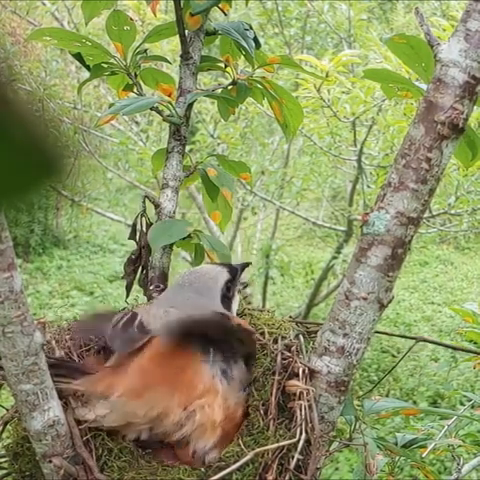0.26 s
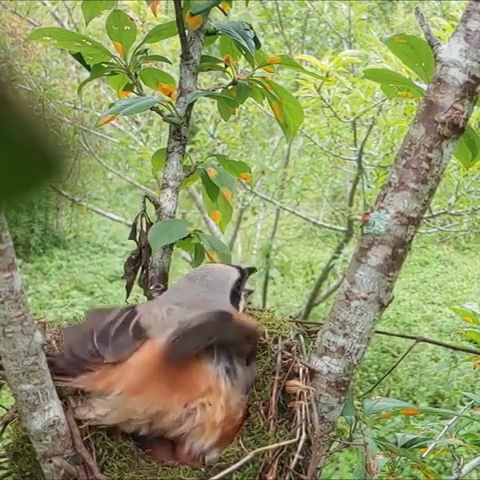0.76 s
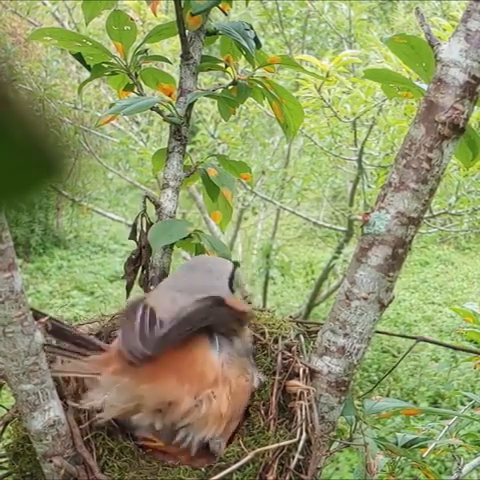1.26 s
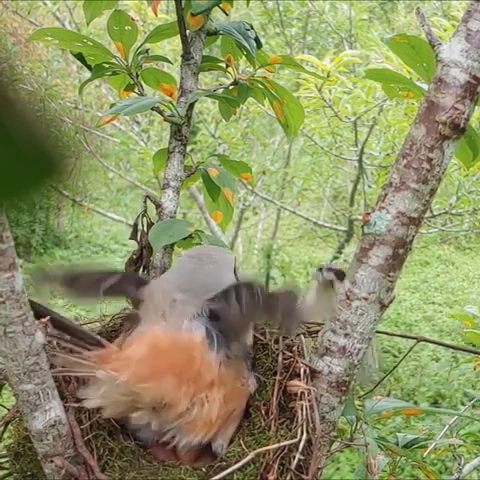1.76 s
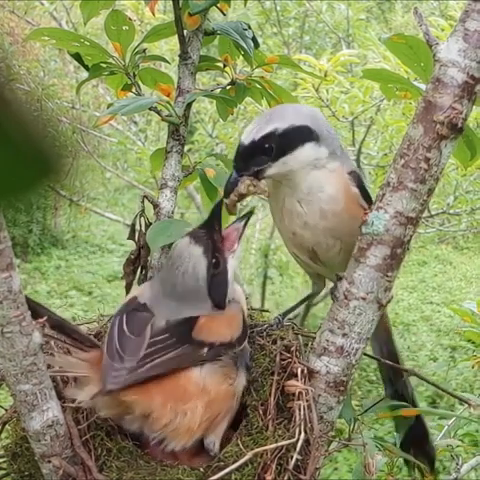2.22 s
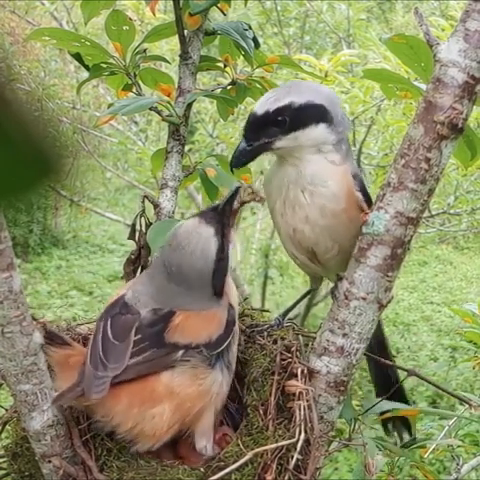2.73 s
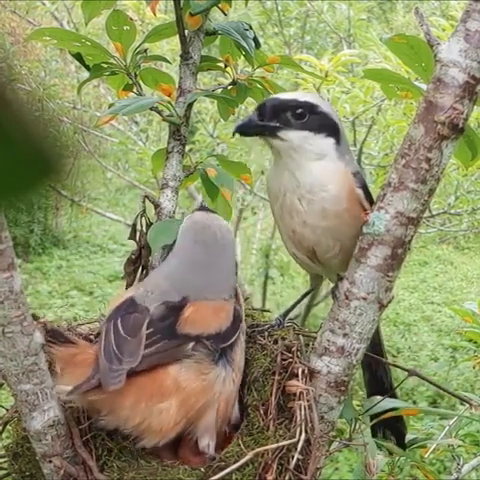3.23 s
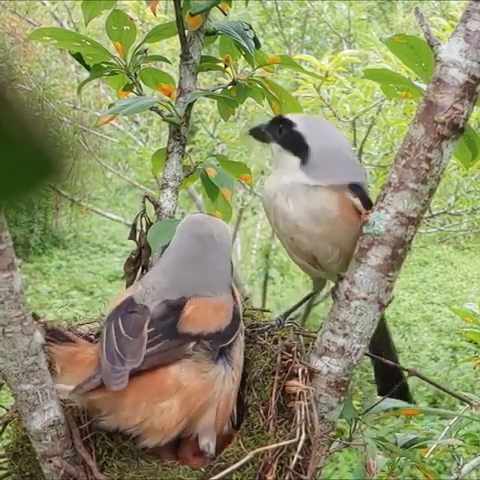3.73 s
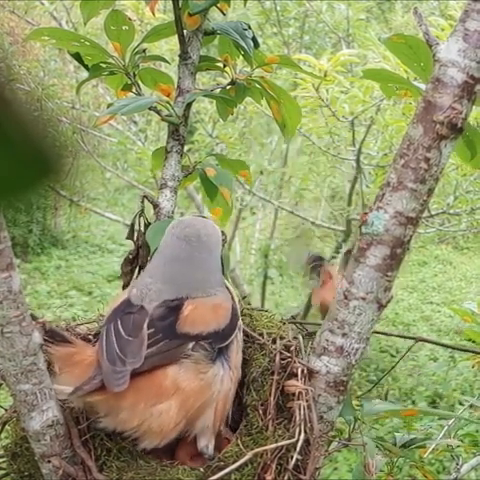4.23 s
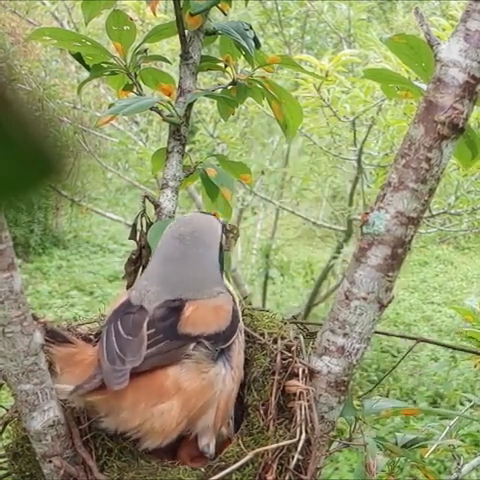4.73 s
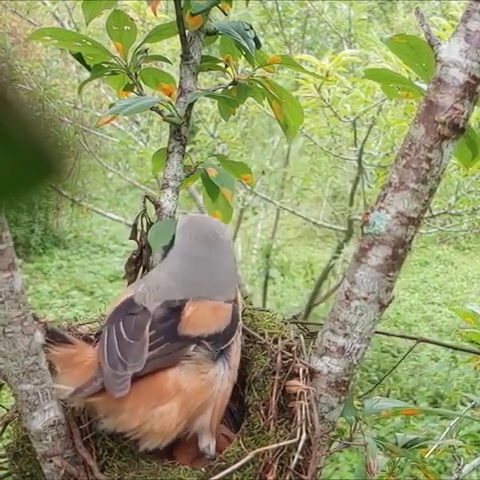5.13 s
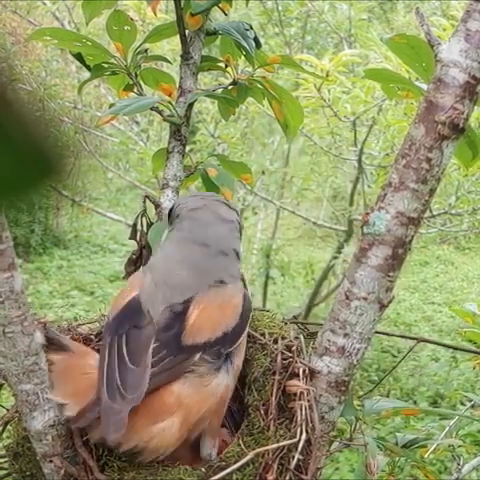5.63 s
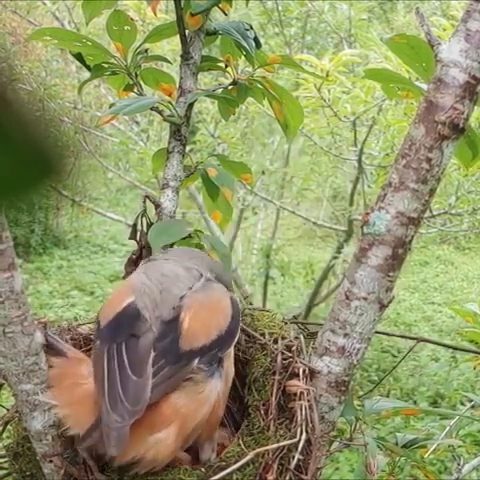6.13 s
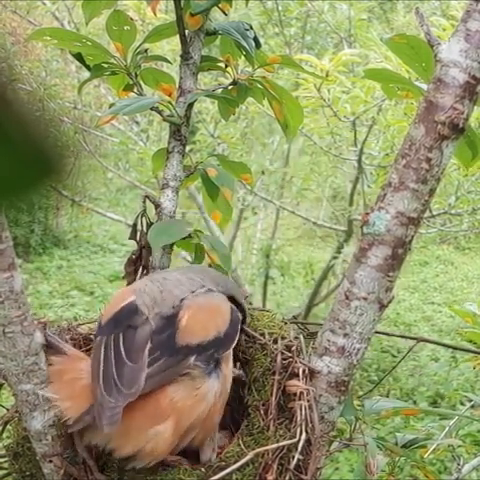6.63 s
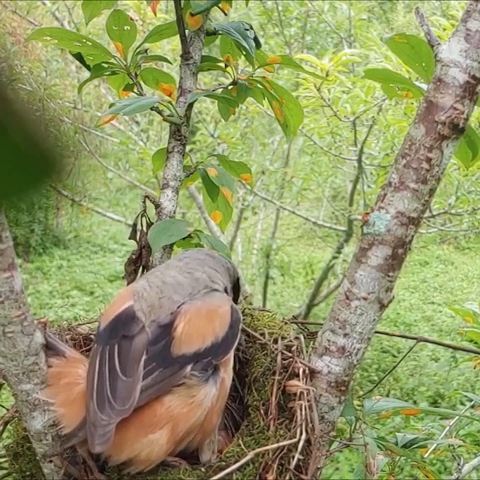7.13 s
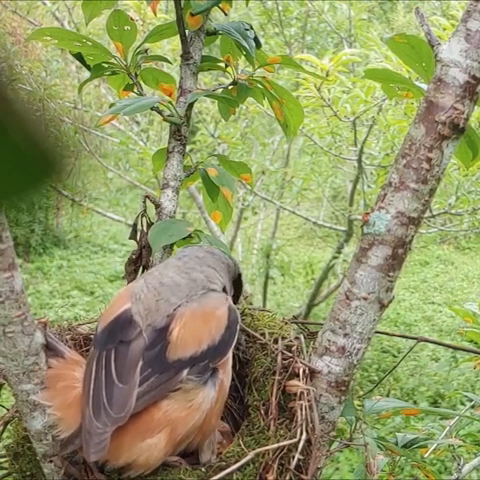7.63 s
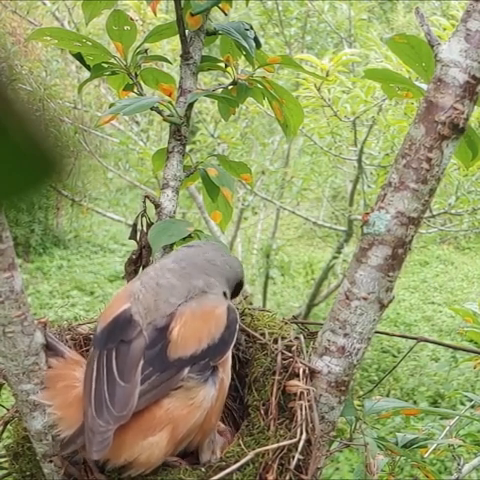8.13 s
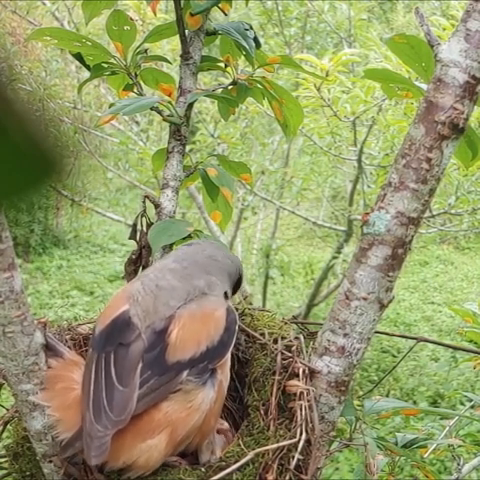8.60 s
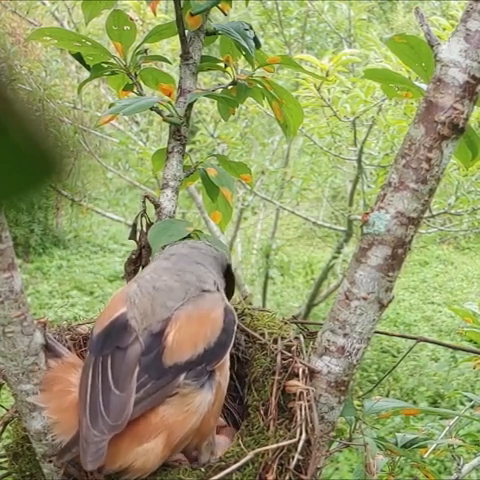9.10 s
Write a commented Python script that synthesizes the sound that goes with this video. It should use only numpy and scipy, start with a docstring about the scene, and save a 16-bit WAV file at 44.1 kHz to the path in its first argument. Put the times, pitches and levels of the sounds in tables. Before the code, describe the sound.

A high, steady insect drone with fine sizzle, wavering tones and quick trills surrounds a close nest in a quiet wood. From 0 s a begging nestling is already calling: a short rasp, then a long, rough, nasal cry from about 0.35 to 1.6 s. At 1.5-2.1 s the parent flutters in with soft, low puffs of air and a light landing knock. The third cry climbs, becoming very loud, clearer and squealing around 2.2-2.8 s as food is passed. Shorter, strained, quavering cries follow, each weaker, ending near 4.2 s. Irregular take-off flaps at 4.2-4.5 s become an even whirr, fading by about 5.7 s. A faint twig tap comes near 5.1 s and one soft low peep at 6.4 s. Distant chips follow until 7.7 s, then falling whistles near 7.6, 8.0 and 9.1 s, with thin notes around 8-8.7 s.

```python
"""Insects drone in the wood throughout: noise bands, wavering tones and trills of short falling notes.
From the start a shrike nestling begs in six rasping calls: rough harmonics pass through throat resonances.
The parent flutters in on pulses of pushed air; the calls clear to a shrill squeal as it is fed, then sink.
Small birds call far off in gliding tones, their echo scattered by the trees. The parent whirrs away,
its even wing beats fading with distance, and later the nestling gives one soft peep."""
import sys
import numpy as np
from scipy import signal
from scipy.fft import rfft, irfft, next_fast_len
from scipy.io import wavfile
from scipy.ndimage import uniform_filter1d, map_coordinates

SR = 44100
rng = np.random.default_rng(int(sys.argv[2]) if len(sys.argv) > 2 else 0)


def store_wav(level_fs):
    """Save 16-bit WAV to argv[1]."""
    pcm = np.round(np.clip(np.atleast_2d(level_fs), -1, 1) * 32767)
    wavfile.write(sys.argv[1], SR, pcm.T.astype(np.int16))


N = 412776

# Lower band of the insect chorus. Each row: frequency in Hz, relative density in dB per Hz.
BUZZ_SPECTRUM = [(1290, -49), (2200, -52), (2380, -41), (2500, 23), (2550, -58), (2720, 10.5), (3070, 18),
                 (3300, 20.5), (4290, -23), (7260, -120)]
# Slow swell of that band. Each row: time in seconds, level in dB.
BUZZ_SWELL = [(4.25, -66), (5.32, -90), (5.56, -52.5), (5.96, -72), (6.36, -66), (7.12, -62), (8.75, -52.5),
              (9.13, -53), (9.36, -51.5)]
# Middle band of the chorus. Each row: frequency in Hz, relative density in dB per Hz.
DRONE_SPECTRUM = [(1940, -52), (3300, -0.5), (4010, 6.5), (4370, 4), (4760, -17), (5000, -57), (6500, -48),
                  (11000, -120)]
# Upper band of the chorus. Each row: frequency in Hz, relative density in dB per Hz.
SIZZLE_SPECTRUM = [(2820, -43), (4800, -54), (4950, -0.5), (5490, -0.5), (6480, 12.5), (7350, -0.5),
                   (8630, -5.5), (10300, -13), (10800, -20.5), (11600, -20), (12200, -27), (12600, -52),
                   (14000, -63)]
# Insect tones. Each row: mean frequency in Hz, relative steady level in dB,
# level in dB relative to the buzz of the part that swells with it.
WHINE_TONES = [(2395, -66, -31), (2550, -80, -21.5), (2640, -57, -20), (2750, -67, -2.5),
               (2837, -57.5, -13), (2910, -76, 2.5), (2995, -59, -18), (3130, -77, -7), (3166, -55, 1),
               (3436, -54, 1), (3747, -59, -5)]
WHINE_DRIFT_DB = 2
# Hush of the wood. Each row: frequency in Hz, relative density in dB per Hz.
AIR_SPECTRUM = [(12, -40), (20, -6), (54, -0.5), (200, -3.5), (244, -6), (280, -1.5), (409, -8.5),
                (551, -7.5), (1370, -16.5), (2000, -19), (2300, -15.5), (2990, -10), (5060, -120)]
AIR_DB = -57
# Likeness of left and right in diffuse sound. Each row: frequency in Hz, correlation from -1 to 1.
EAR_LIKENESS = [(60, 0.049), (130, 0.12), (290, 0.29), (630, 0.24), (1380, 0.15), (3010, 0.22),
                (6600, -0.29), (14400, 0.98)]

# Begging calls, one list of rows each. Each row: time in seconds, pitch in Hz before the bends at the ends,
# roughness (limited to 0-1), effort in dB, closing of the bill from 0 to 1,
# main throat resonance in Hz, upper throat resonance in Hz.
BEG_CALLS = [
    [(-.1, 855, 0.73, 3, 0.23, 3140, 5360), (.18, 866, 0.75, 1.5, 0.17, 2980, 5400),
     (.262, 876, 1, 6, 0.2, 3220, 5370), (.296, 845, 1.23, 1, 0.2, 3450, 5600)],
    [(.35, 720, 0.85, -7.5, 0.23, 3300, 5500), (.46, 762, 0.73, -2.5, 0, 3020, 5900),
     (.55, 751.6, 0.77, -0.5, 0.03, 3180, 6100), (1.1, 747, .87, 1.5, 0.07, 3180, 5880),
     (1.34, 797, 0.84, 4, 0.02, 3230, 5850), (1.43, 739, 0.82, 1.5, .02, 3050, 6060),
     (1.468, 825, 0.62, 6, 0.28, 3274, 6350), (1.49, 814, 0.64, 4.5, 0.13, 3300, 6360),
     (1.545, 852, 0.47, 8, 0.29, 3350, 6460), (1.568, 863, 0.35, 9, 0.07, 3700, 6100),
     (1.59, 793, 1, 1, 0, 3900, 5800)],
    [(1.641, 690, 0.9, -6.5, 0.02, 3350, 6100), (1.74, 682, 0.69, -1.5, 0, 2860, 6160),
     (1.87, 770.4, 0.83, 4.5, 0.07, 3470, 5800), (2.06, 781, 0.76, 5.5, 0.02, 3220, 5340),
     (2.14, 811, 0.82, 9, 0.18, 3250, 5500), (2.163, 814, 0.94, 9, .3, 3267, 5600),
     (2.185, 828, 0.74, 11, 0.21, 3000, 5430), (2.33, 839, 0.73, 13, .27, 3010, 5940),
     (2.342, 868, 0.37, 11.5, 0.11, 3100, 5600), (2.36, 858, 0.3, 12.5, 0.28, 3195, 5200),
     (2.4, 850, 0.03, 12.5, 0.2, 2975, 5280), (2.424, 843, 0.18, 14, 0.2, 2760, 5100),
     (2.432, 843, 0.65, 9.5, .21, 2600, 5800), (2.455, 871, 0.48, 11.5, 0.34, 2750, 6000),
     (2.52, 848, 0.2, 9.5, 0.32, 2900, 5900), (2.615, 821, 0.28, 6.5, 0.35, 2860, 5750),
     (2.655, 855, 0.25, 6.5, 0.35, 3016, 6000), (2.672, 876, 0.04, 11.5, 1, 2800, 5300),
     (2.692, 860, 0.54, 7, 0.48, 2700, 5600), (2.725, 900, 0.34, 10.5, .55, 2680, 6000),
     (2.757, 939, 0.56, 11.5, 0.73, 2674, 6150), (2.778, 843, 1.1, 7, 1, 2820, 5600)],
    [(2.834, 722, 1.08, 1.5, 0.67, 2810, 5190), (2.88, 631, 0.91, -7.5, 0.49, 4070, 4900),
     (2.975, 676, 0.9, -1, 0.6, 4600, 4790), (2.995, 713, 0.89, -1, 0.6, 4260, 4950),
     (3.1, 767, 0.81, 2, 0.73, 4230, 4700), (3.15, 757, 0.55, -1.5, 0.68, 4300, 4400),
     (3.19, 830, 0.72, 4, 0.7, 3800, 5000), (3.222, 890, 0.68, 5, 0.94, 3100, 4600),
     (3.25, 739, 1, -5, 0.55, 3100, 4500)],
    [(3.303, 652, 1.17, -9.5, 0.44, 3700, 5000), (3.36, 622.6, 1, -10.5, 0.43, 3950, 4960),
     (3.42, 710, 0.81, -2.5, 0.45, 4250, 4900), (3.52, 784, 0.7, -2, 0.59, 4130, 4860),
     (3.575, 820, 0.6, -1.5, 0.58, 3900, 4600), (3.622, 830, 0.4, 2, 0.58, 3400, 4140),
     (3.658, 620, 0.94, -11, 0.4, 3330, 4280)],
    [(3.81, 597, 0.83, -48, 0.3, 3600, 5200), (3.86, 588.5, 0.9, -21, 0.3, 3700, 5200),
     (3.89, 673, 0.92, -12, 0.42, 3500, 5000), (3.94, 702, 0.77, -10, 0.54, 3730, 4900),
     (4.005, 705, 0.71, -12, 0.47, 3750, 4800), (4.038, 641, 0.52, -12.5, 0.7, 3650, 4600),
     (4.053, 618, 1.06, -11, 0.5, 3540, 4800), (4.062, 634, .95, -9, 1, 3500, 4800),
     (4.076, 635, 0.97, -9, 0.7, 3550, 4900), (4.086, 704, .92, -5.5, .56, 3700, 5200),
     (4.132, 725.6, 0.85, -6, .66, 3650, 5100), (4.152, 660, 0.8, -7, 0.6, 3750, 4600),
     (4.182, 560, .75, -13, 0.6, 3700, 4500)],
]
ATTACK_S, RELEASE_S = 0.01, 0.014
ONSET_LEAP, SETTLE_S = 0.36, 0.016  # share by which the pitch starts too high, time constant of settling
END_DROP, DROP_S = 0.38, 0.009  # share by which the pitch falls at the end, time constant of the fall
# The strained voice shakes: mean rate, depth as a share of the pitch, depth in level.
QUIVER_HZ, QUIVER_SHARE, QUIVER_DB = 66, 0.05, 3
# Random level curves of the voice: depth in dB, random knots per second.
BREAK_DB, BREAK_RATE = 3, 65  # harmonics, most in the upper ones
PARTIAL_DRIFT_DB, PARTIAL_DRIFT_RATE = 1.8, 14  # every harmonic alike in depth
WAVER_DB, WAVER_RATE = 1, 34  # each resonance, behind a closing bill
CREAK_DB, CREAK_RATE = -2.5, 58  # uneven pulses of a hoarse voice behind a closing bill
GRAIN_DB, OPEN_GRAIN = 3.8, 0.25  # depth factor of the hoarse grains, offset for an open bill
# Turbulence in the open bill. Each row: frequency in Hz, relative density in dB per Hz.
BREATH_SPECTRUM = [(600, -11.5), (1800, 4.5), (3000, -1), (12000, 1)]
# Radiation from the open bill. Each row: frequency in Hz, relative response in dB.
BILL_RADIATION = [(400, -17), (650, -6.5), (900, 13.5), (2000, 6), (3000, 13), (4500, 9.5), (6000, 13.5),
                  (6900, 16), (7750, 14.5), (8050, 7), (9700, 23), (11000, 11.5), (13000, 10), (15000, 1)]
# Throat resonances at the usual pitch and resonances, bill open, voice clean and effort 0.
# Each row: centre in Hz, nominal width in Hz, level in dB, dB per dB of effort, dB added as the bill closes,
# dB added from clean to rough, power of the pitch it follows, power of the main resonance it follows,
# power of the upper resonance it follows, octaves it moves as the bill closes.
THROAT_RESONANCES = [ (722, 183, -47.5, 0.54, 9, -6.5, 0.02, 0.0095, 0.13, -0.04),
                     (1590, 880, -43, 0.27, 14, -2, 0.77, 0.28, 0.19, 0.26),
                     (3270, 810, -31, 0.98, -19, 3, -0.12, 1, 0.12, 0.013),
                     (5806, 1760, -30.5, 1.28, -4, -3, -0.17, 0, 0.83, -0.14),
                     (10100, 2900, -54, 1.46, -5.5, -6.5, -0.47, 0.43, 0, -0.061),
                     (12100, 2230, -82, 3.16, -2, 6, -0.28, 0.91, 0.33, 0.025), ]
USUAL_HZ, USUAL_THROAT_HZ, USUAL_UPPER_HZ = 750, 3200, 5910
CLEAN_WIDTH, ROUGH_WIDTH = 0.48, 0.53  # share of the nominal width when clean, share gained when rough
# Squeaks, where the begging voice slips into a single gliding tone. Each row: start in seconds,
# length in seconds, first pitch in Hz, last pitch in Hz, level in dB, pitch scatter as a share.
SQUEAKS = [ (1.566, 0.019, 4290, 3700, -30, 0.016), (2.985, 0.042, 4950, 6700, -41, 0.047),
           (3.074, 0.049, 4990, 6740, -44, .06), (3.132, 0.04, 4730, 4170, -40, 0.014),
           (3.158, .035, 4400, 5000, -35, 0.048), (3.794, 0.018, 1490, 1250, -45.5, 0.027),
           (3.808, .058, 1204, 1140, -45, 0.054), (3.92, 0.081, 1095, 1173, -45.5, 0.056),
           (3.992, 0.013, 1440, 1380, -45, .02), (4.043, 0.013, 960, 1070, -45, .02),
           (4.079, 0.026, 1290, 1470, -42, .025), (4.107, 0.018, 1350, 1500, -35.5, .025),
           (4.136, 0.025, 1503, 1190, -36, .025), ]
# The nestling's soft peep. Each row: time from its start in seconds, pitch in Hz, relative level in dB.
PEEP_SHAPE = [(0, 960, -17), (.006, 950, 4), (.014, 870, 1), (.024, 820, -20)]
# When it peeps. Each row: start in seconds, level in dB.
PEEP_TIMES = [(6.382, -58)]
OVERTONE_DB = -3  # the peep's octave
# Reflection from the bark. Each row: frequency in Hz, relative response in dB.
BARK_REFLECTION = [(1500, -47), (4000, -36), (5500, -4.5), (7500, 7), (12000, 1)]
TRUNK_HZ, TRUNK_SHARE = 851, 0.22  # the echo lags one period of this frequency; factor on its strength
# Where the voice sits. Each row: frequency in Hz, left minus right in dB.
VOICE_LEAN = [(1200, -3), (2900, 0), (5500, -1), (10000, -1)]
# Decay of the scattered sound. Each row: frequency in Hz, time to fall by 60 dB in seconds.
WOOD_DECAY = [(200, 0.058), (3000, 0.84), (10000, 0.56)]

# Flights of the parent. Each row: first beat in seconds, end in seconds, seconds between beats,
# time of nearest approach in seconds, seconds to pass the microphone, level when nearest in dB,
# relative feather swish in dB, nominal thud pitch in Hz.
FLIGHTS = [(1.517, 1.8, .0515, 2.02, 0.059, -26, -5.5, 121),
           (1.823, 2.06, 0.053, 1.91, 0.15, -27, -18, 140),
           (4.591, 5.7, .0639, 4.61, 0.15, -32.5, -15, 174)]
# Single strokes on landing and taking off. Each row: time in seconds, stroke level in dB,
# relative feather swish in dB, nominal thud pitch in Hz.
WING_STROKES = [(2.084, -41, -2, 126), (2.105, -42, 3, 125), (4.182, -39, -9, 110), (4.23, -47, -16, 109.3),
                (4.34, -32, -17, 94), (4.39, -35, -15, 189), (4.412, -36, -21, 98), (4.464, -32, -17, 171),
                (4.484, -32, -15, 124), (4.531, -30, -18, 190)]
# Air pushed by a wing. Each row: frequency in Hz, relative density in dB per Hz.
PUFF_SPECTRUM = [(12, -29), (20, 0), (38, 0), (92, -12), (173, -8), (208, -11.5), (285, -15.5),
                 (400, -18.5), (520, -16), (880, -62)]
# Swish of the feathers. Each row: frequency in Hz, relative density in dB per Hz.
SWISH_SPECTRUM = [(150, -8), (300, -0.5), (600, -3.5), (1200, -7), (3500, -27), (6000, -120)]
FADE_DB = 20.5  # loss of a wing beat for each tenfold distance
UPSTROKE_S, UPSTROKE_DB = 0.0194, -6.5  # a weaker upstroke follows each beat
# Feet on the twigs. Each row: time in seconds, level at the onset in dB, pitch in Hz.
FOOT_TAPS = [(2.087, -39, 529), (5.055, -53, 540)]

# A distant thin note. Each row: time from its start in seconds, pitch in Hz, relative level in dB.
SEEP_SHAPE = [(0, 7030, -11), (.012, 6880, -1.5), (.03, 7450, -10.5), (.05, 7400, -15)]
# Its even runs. Each row: first note in seconds, end in seconds, seconds between notes, mean level in dB.
SEEP_RUNS = [(2.88, 3.63, 0.11, -47.5), (8.01, 8.74, .112, -45)]
# A distant chip. Each row: time from its start in seconds, pitch in Hz, relative level in dB.
CHIP_SHAPE = [(0, 5220, -21), (.01, 5090, 5), (.024, 5030, -1), (.04, 4800, 0)]
# Its even runs. Each row: first note in seconds, end in seconds, seconds between notes, mean level in dB.
CHIP_RUNS = [(6.452, 6.52, .137, -50), (6.79, 7.68, .137, -54)]
# A distant falling whistle. Each row: time from its start in seconds, pitch in Hz, relative level in dB.
SLUR_SHAPE = [(0, 3650, -20), (.012, 3800, 0), (.035, 3880, 0), (.05, 3700, 0), (.062, 3050, -6),
              (.085, 2600, -4), (.115, 2380, -7), (.145, 2260, -12), (.17, 2230, -35)]
# When it is sung. Each row: start in seconds, level in dB.
SLUR_TIMES = [(7.551, -40.5), (8.042, -53), (9.087, -42)]

TOP_HZ = 14900


def amp(db):
    """Decibels express a ratio of amplitudes; this returns the gain."""
    return 10 ** (np.asarray(db) / 20)


def unit(x):
    """Normalization: the signal at rms 1."""
    return x / np.sqrt(np.mean(x ** 2) + 1e-20)


def along(points, hz):
    """Interpolation of (Hz, value) points on a logarithmic frequency axis."""
    f, v = np.transpose(points)
    return np.interp(np.log(hz + 1), np.log(f + 1), v)


def curves(rows, t):
    """Linear interpolation of each column after the time, read at the times t."""
    s, *cols = np.transpose(rows)
    return [np.interp(t, s, c) for c in cols]


def wobble(rate, size=N, count=8):
    """Band-limited random modulation: a spline through rate knots a second, with count steps between knots."""
    knots = rng.standard_normal(int(size * rate / SR) + 4)
    steps = np.arange((len(knots) - 1) * count) / count
    return np.interp(np.arange(size) * rate / SR, steps, map_coordinates(knots, [steps]))


def filtered(x, response):
    """Linear filtering: the spectrum of x is multiplied by a response of frequency."""
    n = x.shape[-1]
    m = next_fast_len(n + 8192)
    return irfft(rfft(x, m) * response(np.fft.rfftfreq(m, 1 / SR)), m)[..., :n]


def coloured(spectrum, size):
    """Spectral shaping of white noise, brought to rms 1."""
    return unit(filtered(rng.standard_normal(size), lambda hz: amp(along(spectrum, hz))))


def spread(spectrum):
    """Diffuse field: noise from all round, partly alike at the two ears, rms 1 in the middle."""
    def side_to_mid(hz):
        """The ratio of side to middle follows from the correlation of the ears."""
        alike = np.clip(along(EAR_LIKENESS, hz), -.6, .99)
        return np.sqrt((1 - alike) / (1 + alike))

    mid = coloured(spectrum, N)
    side = filtered(coloured(spectrum, N), side_to_mid)
    return np.array([mid + side, mid - side])


def add(track, s, x):
    """Superposition: mix x into the track from time s."""
    first = round(s * SR)
    x = x[max(-first, 0):]
    part = track[max(first, 0):][:len(x)]
    part += x[:len(part)]


def panned(x, left_db):
    """Interaural level difference: x is made left_db louder on the left."""
    return x * amp([[left_db / 2], [-left_db / 2]])


def triller(rate, from_hz, to_hz, db):
    """Stridulation: every wing stroke is a short gliding note, with a rest before the next."""
    cycle = (rng.random() + np.cumsum(rate * (1 + 0.058 * wobble(8))) / SR) % 1
    stroke = np.minimum(cycle / .42, 1)
    hz = from_hz + (to_hz - from_hz) * stroke + 60 * wobble(500) + 70 * wobble(15)
    note = np.sin(np.pi * stroke) ** 2 * np.sin(2 * np.pi * np.cumsum(hz) / SR)
    return amp(db + 2.9 * wobble(22)) * unit(note)


def whine_at_ear(buzz_db, whine_db, width_hz):
    """Frequency-modulated tones, each the power sum of a steady part and one that swells with the buzz."""
    out = np.zeros(N)
    for hz, db, share_db in WHINE_TONES:
        moving_hz = hz + width_hz * (wobble(60) + .7 * wobble(3))
        tone = np.sqrt(2) * np.sin(2 * np.pi * np.cumsum(moving_hz) / SR)
        level = np.hypot(amp(db), amp(buzz_db + share_db))
        out += level * amp(whine_db + WHINE_DRIFT_DB * wobble(2.63)) * tone
    return out


def insects(drone_db, sizzle_db, whine_db, whine_width_hz):
    """Many incoherent sources merge into three noise bands, with wavering tones and three nearer trillers."""
    buzz_db, = curves(BUZZ_SWELL, np.arange(N) / SR)
    buzz = amp(buzz_db + 2.1 * wobble(30)) * spread(BUZZ_SPECTRUM)
    drone = amp(drone_db + 0.91 * wobble(2.695) + 1.9 * wobble(130)) * spread(DRONE_SPECTRUM)
    sizzle = amp(sizzle_db + 0.79 * wobble(60)) * spread(SIZZLE_SPECTRUM)
    # the tones reach each ear by its own paths
    whine = np.array([whine_at_ear(buzz_db, whine_db, whine_width_hz) for ear in range(2)])
    left = triller(rate=17.0, from_hz=4550, to_hz=3496, db=-60)
    right = triller(rate=14.0, from_hz=4500, to_hz=3510, db=-57.5)
    ahead = triller(rate=40, from_hz=3700, to_hz=3720, db=-64)
    chorus = panned(buzz + whine, -1.3) + panned(drone + sizzle, -1.16)
    return chorus + panned(left, 17) + panned(right, -1.6) + ahead


def hush():
    """Broadband ambience: the steady hush of the wood is shaped, diffuse noise."""
    return amp(AIR_DB) * spread(AIR_SPECTRUM)


def gesture(rows, t):
    """Exponential relaxation: the pitch of a call settles from above and drops at the end."""
    pitch, rasp, effort_db, closing, throat_hz, upper_hz = curves(rows, t)
    since = np.maximum(t - rows[0][0], 0)
    left = np.maximum(rows[-1][0] - t, 0)
    bend = (1 + ONSET_LEAP * np.exp(-since / SETTLE_S)) * (1 - END_DROP * np.exp(-left / DROP_S))
    return pitch * bend, np.clip(rasp, 0, 1), effort_db, np.clip(closing, 0, 1), throat_hz, upper_hz


def quiver(closing):
    """Tremor: the strained voice shakes in quick, uneven bursts, more as the bill closes."""
    n = len(closing)
    shake = np.sin(2 * np.pi * np.cumsum(QUIVER_HZ * (1 + .25 * wobble(45, n))) / SR)
    return closing * shake * (1 + .7 * np.tanh(wobble(22, n)))


def harmonics(hz, pitch, count=16):
    """Fourier series: partials below number count, weaker above about 7 kHz, each swelling on its own."""
    n = len(pitch)
    turns = np.cumsum(hz) / SR
    total = np.zeros(n)
    for k in range(1, count):
        reach = np.clip((7700 - k * pitch) / 600, .3, 1)
        break_db = BREAK_DB * min(k / 6, 1) * wobble(BREAK_RATE, n)
        drift_db = PARTIAL_DRIFT_DB * wobble(PARTIAL_DRIFT_RATE, n)
        partial = np.cos(2 * np.pi * (k * turns + rng.random()))
        total += reach * amp(break_db + drift_db) * partial
    return unit(total)


def syrinx(pitch, rasp, closing, jitter, flutter, flutter_hz, quaver, shimmer, doubling,
           second_hz, second_follows, second_share, hiss, croak):
    """Coupled membranes: the main one flutters and doubles its period as it roughens; another joins in."""
    n = len(pitch)
    beat = np.sin(2 * np.pi * np.cumsum(flutter_hz * (1 + 0.149 * wobble(40.1, n))) / SR)
    unsteady = .004 * wobble(60, n) + quaver * wobble(240, n)
    rough_pitch = rasp * (jitter * rasp * wobble(450, n) + flutter * beat)
    main = harmonics(pitch * (1 + rough_pitch + unsteady), pitch)
    # modulation at half the pitch makes alternate periods strong and weak
    half_phase = np.pi * np.cumsum(pitch * (1 + 0.017 * wobble(28.5, n))) / SR
    alternate = 1 + doubling * rasp ** 2 * np.cos(half_phase)
    second_pitch = second_hz * (pitch / USUAL_HZ) ** second_follows
    second = harmonics(second_pitch * (1 + .03 * wobble(7, n) + 0.0257 * wobble(500, n)), pitch)
    voice = main * alternate * amp(shimmer * rasp * beat) + second_share * rasp ** 2 * second
    low_noise = coloured([(500, 4), (1000, -9.5), (2500, -6), (6000, -20)], n)
    air = hiss * coloured(BREATH_SPECTRUM, n) + croak * closing * rasp * low_noise
    # the hoarsest stretches break into a rattle
    rattle = amp(2 * np.minimum(rasp, 1) ** 4 * np.tanh(wobble(100, n)))
    return rattle * (voice + rasp ** 2 * air)


def throat(source, rows):
    """Source and filter: moving resonances shape the voice; effort and bill set the level of each."""
    hz, frame, z = signal.stft(source, SR, nperseg=384)
    hz = hz[:, None]
    pitch, rasp, effort_db, closing, throat_hz, upper_hz = gesture(rows, rows[0][0] + frame)
    power_gain = 0
    for (rest_hz, width_hz, db, growth, closed_db, rough_db,
         with_pitch, with_throat, with_upper, octaves) in THROAT_RESONANCES:
        centre = rest_hz * (pitch / USUAL_HZ) ** with_pitch * (throat_hz / USUAL_THROAT_HZ) ** with_throat
        centre = centre * (upper_hz / USUAL_UPPER_HZ) ** with_upper * 2 ** (octaves * closing)
        width = width_hz * (CLEAN_WIDTH + ROUGH_WIDTH * rasp)
        shape = amp(along(BILL_RADIATION, hz)) / (1 + ((hz - centre) / width) ** 2) ** 1.5
        # dividing by the smoothed power passed gives each resonance its own level; 4/3 is for the window
        passed = 4 / 3 * uniform_filter1d(np.sum(np.abs(z * shape) ** 2, axis=0), size=13)
        waver = wobble(WAVER_RATE, len(source))
        waver_db = WAVER_DB * np.interp(frame * SR, np.arange(len(source)), waver)
        level = amp(db + growth * effort_db + closed_db * closing + rough_db * rasp + waver_db * closing)
        power_gain = power_gain + (shape * level) ** 2 / np.abs(passed)
    # a hoarse voice comes in coarse grains, the more so behind a closing bill
    smooth = uniform_filter1d(rng.standard_normal(z.shape), size=7, axis=0)
    grains = np.tanh(unit(uniform_filter1d(smooth, size=3, axis=1)))
    grain_gain = amp(GRAIN_DB * rasp * np.sqrt(closing + OPEN_GRAIN) * grains)
    return signal.istft(z * np.sqrt(power_gain) * grain_gain, SR, nperseg=384)[1][:len(source)]


def beg(rows):
    """Phonation: the syrinx sounds through the throat, between a quick attack and release."""
    start, end = rows[0][0], rows[-1][0]
    t = np.arange(start, end, 1 / SR)
    pitch, rasp, _, closing, _, _ = gesture(rows, t)
    shake = quiver(closing) * (1 - rasp ** 2)
    source = syrinx(pitch * (1 + QUIVER_SHARE * shake), rasp, closing, jitter=0.055, flutter=0.034,
                    flutter_hz=176.2, quaver=0.0049, shimmer=1.7, doubling=0.48, second_hz=640.8,
                    second_follows=0.32, second_share=0.81, hiss=1.0, croak=0.83)
    # above the voice proper, air hisses past the bill
    source = source + 0.89 * rasp * coloured([(6800, -47), (7800, 8.0), (14000, -4.0)], len(t))
    creak = amp(CREAK_DB * rasp * closing * wobble(CREAK_RATE, len(t)) - QUIVER_DB * shake)
    attack = np.minimum((t - start) / ATTACK_S, 1)
    release = np.minimum((end - t) / RELEASE_S, 1) ** 2
    return throat(source * creak, rows) * attack * release


def squeak(length, from_hz, to_hz, scatter):
    """Frequency glide: one short, unsteady tone that swells and dies."""
    u = np.arange(0, 1, 1 / (length * SR))
    hz = (from_hz + (to_hz - from_hz) * u) * (1 + scatter * wobble(910, len(u)))
    return unit(np.sqrt(np.sin(np.pi * u)) * np.sin(2 * np.pi * np.cumsum(hz) / SR))


def nestling():
    """Superposition of the begging calls and their squeaks, then one peep with its octave after the meal."""
    out = np.zeros(N)
    for rows in BEG_CALLS:
        add(out, rows[0][0], beg(rows))
    for s, length, from_hz, to_hz, db, scatter in SQUEAKS:
        add(out, s, amp(db) * squeak(length, from_hz, to_hz, scatter))
    octave = [(s, 2 * hz, db + OVERTONE_DB) for s, hz, db in PEEP_SHAPE]
    out += notes(PEEP_SHAPE, PEEP_TIMES, waver=.01) + notes(octave, PEEP_TIMES, waver=.01)
    # the first call is already under way, so the start is eased in over 2 ms
    return out * np.minimum(np.arange(N) / SR / .002, 1)


def trunk(x):
    """Comb filtering: a quick reflection off the trunk beside the nest ripples the treble."""
    def response(hz):
        """Direct sound plus one delayed echo."""
        echo = TRUNK_SHARE * amp(along(BARK_REFLECTION, hz))
        return 1 + echo * np.exp(-2j * np.pi * hz / TRUNK_HZ)

    return filtered(x, response)


def leaning(x):
    """Interaural difference: the nestling's voice reaches the two ears with slightly different colour."""
    return filtered(x, lambda hz: amp(np.outer([.5, -.5], along(VOICE_LEAN, hz))))


def leaves(x, size=480):
    """Diffuse reflection: branches beside the nest return treble at once, opposite in sign at the ears."""
    scatter = coloured([(900, -60), (2800, 2.5), (6000, 8.0), (12000, 3.5)], size) / np.sqrt(size)
    side = signal.fftconvolve(x, scatter)[:N]
    return np.array([side, -side])


def trees(x):
    """Reverberation: trunks and leaves scatter a short decaying tail, different at each ear."""
    hz, t, z = signal.stft(rng.standard_normal((2, SR // 2)), SR, nperseg=256)
    decay = amp(-60 * t / along(WOOD_DECAY, hz)[:, None])
    tail = signal.istft(z * decay, SR, nperseg=256)[1]
    return signal.fftconvolve(x[None], tail / np.linalg.norm(tail[0]), axes=1)[:, :N]


def wing_beats(scatter_db):
    """Spreading loss: even beats, loudest where the bird passes nearest, in the columns of the strokes."""
    beats = []
    for first, end, period, nearest, passing, db, feather_db, hz in FLIGHTS:
        for s in np.arange(first, end, period):
            distance = np.hypot(1, (s - nearest) / passing)  # 1 when nearest
            level_db = db - FADE_DB * np.log10(distance) + scatter_db * rng.standard_normal()
            beats.append((s, level_db, feather_db, hz))
    return beats


def wings(rise, puff_db, swish_db, push_db, slows_to):
    """Unsteady flow: each beat shoves a slowing wave of air, with turbulence and a swish of feathers."""
    out, t = np.zeros(N), np.arange(SR // 6) / SR
    swell = t / rise * np.exp(1 - t / rise)
    slowing = slows_to + (1 - slows_to) * np.exp(-t / rise)
    for s, db, feather_db, hz in wing_beats(scatter_db=0.5) + WING_STROKES:
        phase = 2 * np.pi * np.cumsum(hz * slowing) / SR * rng.uniform(0.72, 1.205)
        push = -amp(push_db) * np.sin(phase)
        puff = amp(puff_db) * coloured(PUFF_SPECTRUM, len(t))
        swish = amp(feather_db + swish_db) * coloured(SWISH_SPECTRUM, len(t))
        add(out, s - .01, amp(db) * swell ** 2 * (push + puff + swish))
        add(out, s - .01 + UPSTROKE_S, amp(db + UPSTROKE_DB) * swell ** 2 * push)
    return out


def feet(t60):
    """Damped impact: claws knock dully on the twigs, falling 60 dB in t60 seconds."""
    out, t = np.zeros(N), np.arange(SR // 10) / SR
    for s, db, hz in FOOT_TAPS:
        spectrum = [(hz / 3, -20), (hz, 0), (hz * 2, -10), (hz * 3, -30), (hz * 10, -60)]
        add(out, s, amp(db - 60 * t / t60) * coloured(spectrum, len(t)))
    return out


def repeated(runs, scatter_db=-2.5):
    """Periodic repetition: the notes of each run, a little uneven in strength, as (s, level dB)."""
    return [(s, db + scatter_db * rng.standard_normal())
            for first, end, period, db in runs for s in np.arange(first, end, period)]


def notes(shape, times, waver):
    """Frequency modulation: one whistled note, a single gliding sine, is given at each time."""
    out, t = np.zeros(N), np.arange(0, shape[-1][0], 1 / SR)
    hz, level_db = curves(shape, t)
    for s, db in times:
        phase = 2 * np.pi * np.cumsum(hz * (1 + waver * wobble(600, len(t)))) / SR
        add(out, s, amp(db + level_db) * np.sqrt(2) * np.sin(phase))
    return out


def far_birds():
    """Pure tones: small birds far off give thin notes, chips and falling whistles."""
    seeps = notes(SEEP_SHAPE, repeated(SEEP_RUNS), waver=0.041)
    chips = notes(CHIP_SHAPE, repeated(CHIP_RUNS), waver=0.035)
    return seeps + chips + notes(SLUR_SHAPE, SLUR_TIMES, waver=.01)


def scene():
    """Superposition of the nest close by and the wood all round."""
    wood = insects(drone_db=-45.5, sizzle_db=-52, whine_db=1.96, whine_width_hz=12.5) + hush()
    chick = trunk(nestling())
    voice = leaning(chick) + amp(-13.0) * leaves(chick) + amp(-22.0) * trees(chick)
    flaps = wings(rise=.017, puff_db=-12, swish_db=-7, push_db=-6, slows_to=.33)
    nest = voice + flaps + feet(t60=0.074)
    far = far_birds()
    return nest + wood + far + amp(-9) * trees(far)


def record(dry):
    """Saturation and band limit: the loudest peaks are rounded off and nothing is kept from TOP_HZ up."""
    rounded = dry / (1 + np.abs(dry / .85) ** 6) ** (1 / 6)
    return filtered(rounded, lambda hz: hz < TOP_HZ)


dry = scene()
out = record(dry)
store_wav(out)
```